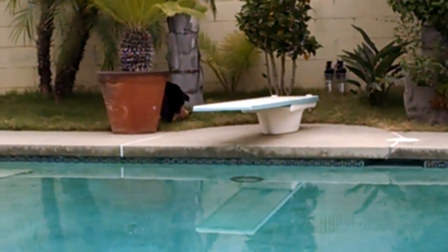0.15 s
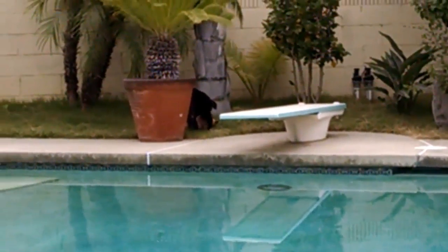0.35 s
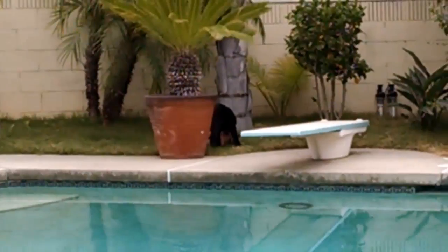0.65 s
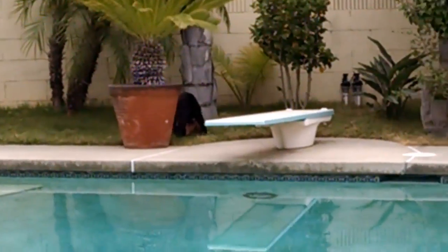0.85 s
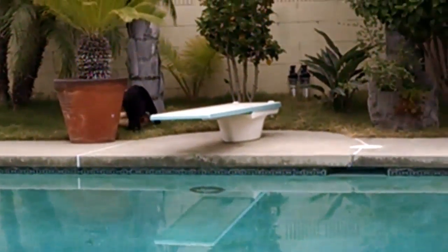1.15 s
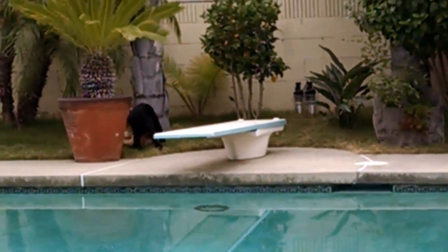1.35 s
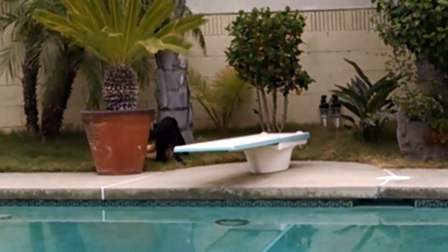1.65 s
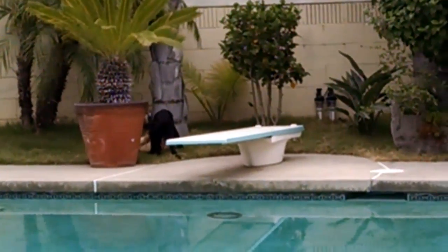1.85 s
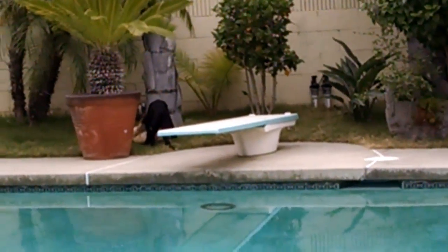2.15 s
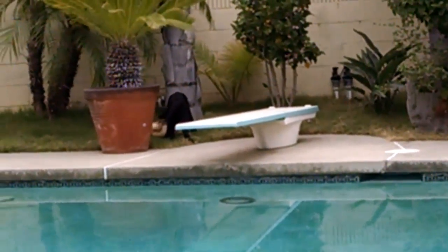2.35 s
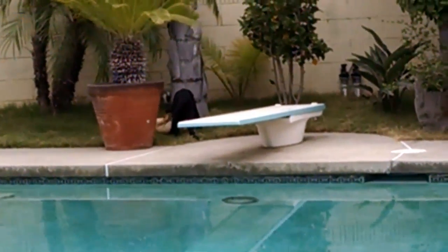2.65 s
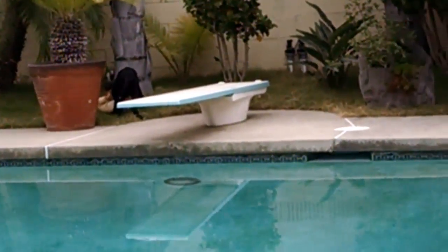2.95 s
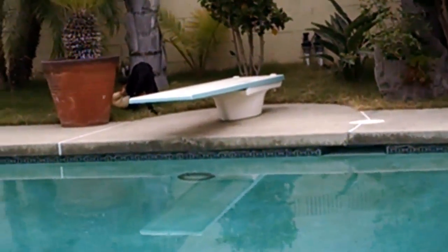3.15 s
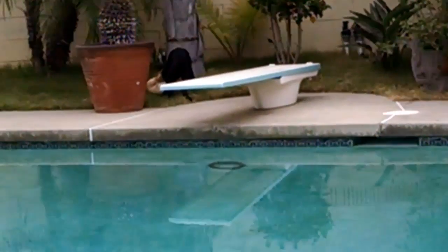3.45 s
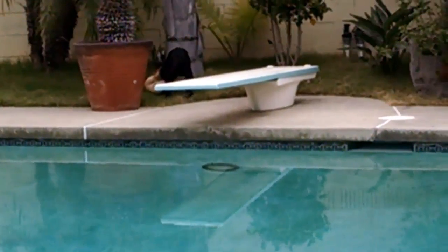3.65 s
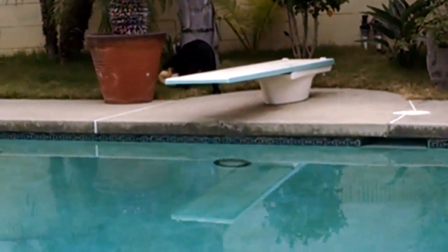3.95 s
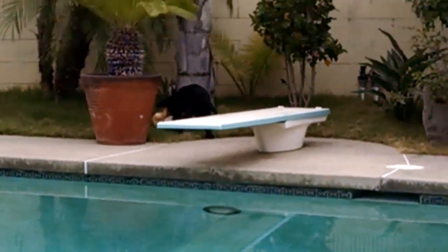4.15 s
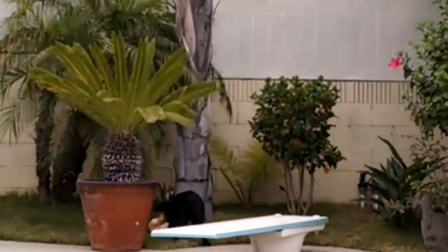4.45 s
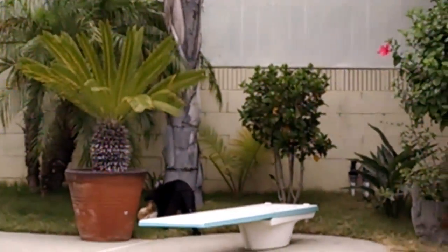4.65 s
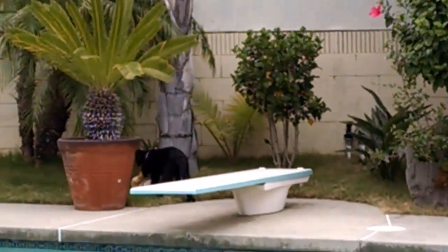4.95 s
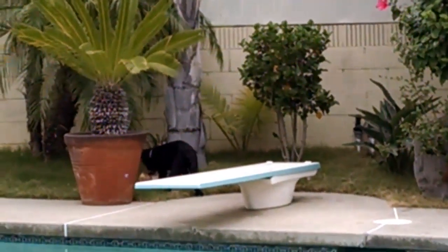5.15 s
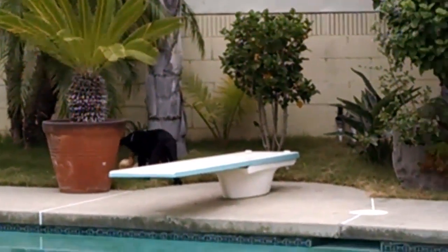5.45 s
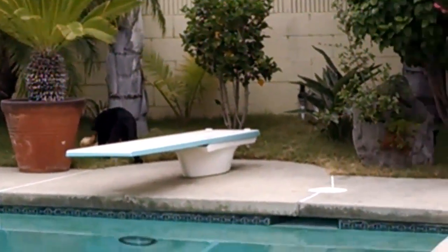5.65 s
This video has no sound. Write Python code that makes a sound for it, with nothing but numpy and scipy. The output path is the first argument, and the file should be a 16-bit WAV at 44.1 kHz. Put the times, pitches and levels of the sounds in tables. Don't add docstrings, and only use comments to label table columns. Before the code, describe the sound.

A pool pump hums steadily while water trickles, gurgles and drips, and a distant engine drone slowly swells over a soft low rumble.

```python
import sys
import numpy as np
from scipy import signal
from scipy.fft import rfft, irfft, next_fast_len
from scipy.io import wavfile
from scipy.ndimage import uniform_filter1d

SR = 44100
rng = np.random.default_rng(int(sys.argv[2]) if len(sys.argv) > 2 else 0)


def makeup_ratio(level_db):
    decades = np.asarray(level_db, float) / 20
    return 10 ** decades


def inscribe(sig):
    pcm = np.round(np.clip(np.atleast_2d(sig).T, -1, 1) * 32767)
    wavfile.write(sys.argv[1], SR, pcm.astype(np.int16))


N = 255339
STEP = 16


def evened(x):
    return x / np.sqrt(np.mean(abs(x) ** 2) + 1e-20)


def read(points, hz):
    f, *columns = np.transpose(points)
    return np.array([np.interp(np.log(hz + 1), np.log(f + 1), c) for c in columns])


def curves(rows, t):
    s, *columns = np.transpose(rows)
    return [np.interp(t, s, c) for c in columns]


def drift(t, top_hz):
    rates_hz = np.geomspace(top_hz / 20, top_hz, num=12)
    return evened(sum(np.sin(2 * np.pi * (f * t + rng.random())) / np.sqrt(f) for f in rates_hz))


def tone(turns, db, pan_db, lead_rad):
    side = np.array([[.5], [-.5]])
    return np.sqrt(2) * makeup_ratio(db + side * pan_db) * np.sin(2 * np.pi * turns + side * lead_rad)


def fading(t, depth_db, top_hz):
    slow = t[::16]
    return [np.interp(t, slow, k * depth_db * drift(slow, top_hz)) for k in (1, 1.3, .25)]


def noise(size, count):
    hop = size // 4
    frames = N // hop + 5
    a, b = rng.standard_normal((frames, size // 2 + 1, count, 2)).T
    return np.fft.rfftfreq(size, 1 / SR), np.arange(frames) * hop / SR, a + 1j * b


def sounded(z, size):
    return signal.istft(z, nperseg=size, noverlap=size * 3 // 4)[1][:, :N]


def add(mix, s, sound):
    part = mix[:, round(s * SR):][:, :sound.shape[1]]
    part += sound[:, :part.shape[1]]


# time in seconds, casing tone in dB, hum L-R in dB, hum in dB,
# hum left lead in rad.
PUMP = [(0.0, -42, 4.5, -54.5, 0.5), (1.3, -48, 10, -54.5, 1.2), (2.4, -46, 1, -50, 2),
        (3.2, -43.5, -1, -53, 1), (4.2, -41.5, 11, -51.5, 1), (4.8, -41, 0, -51, 2),
        (5.3, -43.5, 1, -56, -.6), (5.79, -45.5, 3, -66, 3)]
# Hz, level at the end in dB, gain in dB per second, L-R in dB, left lead in rad.
PUMP_TONES = [(240.0, -62, 1.5, -3, -.6), (346.3, -67, -1, .6, -.6), (349.0, -62, .8, -3, .3),
              (360.0, -62, .3, .6, -.6), (599.8, -61, 3, -3, -.2), (693.0, -67, 1.2, .6, -.3),
              (1038.0, -71, 1.2, -1, 0)]
HUM_HZ, CASING_HZ = 120.0, 174.45


def pump(t):
    casing_db, pan_db, hum_db, lead_rad = curves(PUMP, t)
    swell_db = fading(t, depth_db=2.5, top_hz=2.63)[0]
    out = tone(HUM_HZ * t, hum_db + swell_db, pan_db, lead_rad)
    out += tone(CASING_HZ * t, casing_db, -0.69, -0.85)
    for hz, end_db, gain_db, side_db, ahead_rad in PUMP_TONES:
        swell_db, sway_db, shift_rad = fading(t, depth_db=2.5, top_hz=2.63)
        level_db = end_db + gain_db * (t - t[-1]) + swell_db
        out += tone(hz * t + rng.random(), level_db, side_db + sway_db, ahead_rad + shift_rad)
    return out


# time in seconds, shaft in Hz, nearness in dB, clear path past the walls in dB.
ENGINE = [(0.0, 23.34, -49.5, -53), (0.8, 23.1, -54, -52), (1.2, 23.11, -56, -55), (1.6, 23.16, -50, -52.5),
          (2.0, 23.07, -49, -51), (2.3, 22.85, -50, -50), (2.6, 22.89, -53.5, -53),
          (2.9, 23.03, -47.5, -47.5), (3.2, 22.86, -46.5, -54), (3.6, 22.78, -42.5, -56),
          (4.0, 22.81, -44, -53.5), (4.4, 22.85, -36.5, -52), (4.6, 22.72, -34, -49.5),
          (4.8, 22.77, -34.5, -45.5), (5.1, 22.69, -34, -45), (5.37, 22.8, -34.5, -51),
          (5.56, 22.77, -36.5, -46.5), (5.79, 22.76, -38, -47.5)]
# shaft order, level at the loudest in dB, share of nearness followed,
# share of clear path followed, L-R in dB, left lead in rad.
ORDERS_HEARD = [(4, -46.5, 0.86, 0.0081, 0, 0.6), (15, -51, 0.11, 0.96, -8, -2.05),
                (24, -58.5, 0.5, 1.5, -2, -0.61), (28, -56.5, 0.14, 1.64, -7, 1.1)]
ECHOED_ORDERS = [8, 9, 12, 16, 20, 23, 18]
# middle in seconds, half length in seconds, level in dB,
# L-R in dB, left lead in rad.
ECHO_PATHS = [
    [(.3, 0.4, -80, 0, 1.4), (1.2, 1, -57, -11, -0.5), (2.2, 1, -56.5, -3, 0.82), (3.0, 0.78, -49, 1, -1.3),
     (4.0, 0.28, -50, -13, .5), (4.85, 0.45, -41.5, -2, -0.28), (5.55, 0.48, -47, 11, -1.6)],
    [(.2, 0.22, -61, 16, 6.7), (1.75, 0.48, -46, -3, 0.32), (2.4, 0.28, -52.5, 5, 1.1),
     (3.1, 0.32, -55.5, 14, 1.52), (3.8, 0.39, -57, -5, 1.5), (4.6, 0.23, -52, -7, 1.3),
     (5.5, 0.71, -43, 2.5, 0.59)],
    [(.1, 0.27, -57, 2, 1), (.9, 0.49, -54, 9, 1.4), (1.7, 0.25, -53.5, 9, 0.8),
     (2.25, 0.23, -56.5, 3, 0.5), (4.2, 0.26, -60, 7, -2.5), (4.95, 0.27, -55.5, 12, 0.5),
     (5.4, 0.26, -56, -4, -4.5)],
    [(.4, 0.67, -66, -10, 2.5), (1.55, 0.21, -51, -2, 1), (2.4, 0.45, -48.5, -6, 1.26),
     (3.2, 0.21, -60, -6, -4.5), (3.8, 0.27, -54, 0, 1.5), (4.3, 0.39, -59, 6, -3.5),
     (4.8, 0.32, -45, 4, -1.7), (5.3, 0.28, -51, -5, -3.5), (5.7, 0.49, -48.5, -7, -0.8)],
    [(4.1, .4, -67, -1, 1), (4.95, 0.27, -45, 10, 3.5), (5.65, 0.36, -50.5, 2, 0.45)],
    [(.3, 0.44, -61.5, -5, .5), (1.1, .4, -64.5, -4, .5), (2.3, 0.29, -64.5, 0, .5),
     (4.95, 0.28, -53, 0, 0.67), (5.6, .25, -62, 2, .5)],
    [(.3, 0.26, -63, 2, 0.57), (1.5, 0.11, -58, -2, 0.46), (2.3, 0.55, -60, 0, .5)],
]
SWEEP_RAD = 0.17
FARTHEST_RIGHT_S, RIGHT_DB, SWING_DB_PER_S2 = 2, -7.5, 1.0
MOST_AHEAD_S, AHEAD_RAD, BEND_RAD_PER_S2 = 3.78, 6.43, 0.37


def engine_follow_db(t, by_near, by_clear):
    _, near_db, clear_db = curves(ENGINE, t)
    return by_near * (near_db - near_db.max()) + by_clear * (clear_db - clear_db.max())


def engine(t):
    shaft_hz, near_db, _ = curves(ENGINE, t)
    turns = np.cumsum(shaft_hz) * STEP / SR
    pan_db = RIGHT_DB + SWING_DB_PER_S2 * (t - FARTHEST_RIGHT_S) ** 2
    lead_rad = AHEAD_RAD - BEND_RAD_PER_S2 * (t - MOST_AHEAD_S) ** 2
    out = tone(6 * turns, near_db, pan_db, lead_rad)
    for order, db, by_near, by_clear, side_db, ahead_rad in ORDERS_HEARD:
        swell_db, sway_db, shift_rad = fading(t, 0.048 * order, top_hz=1.54)
        level_db = db + engine_follow_db(t, by_near, by_clear) + swell_db
        out += tone(round(order) * turns + rng.random(), level_db, side_db + sway_db, ahead_rad + shift_rad)
    for order, paths in zip(ECHOED_ORDERS, ECHO_PATHS):
        start = rng.random()
        flutter_db = fading(t, 0.071 * order, top_hz=6.0)[0]
        for middle, half, db, side_db, ahead_rad in paths:
            opening = np.exp(-((t - middle) / half) ** 2)
            lead_rad = ahead_rad - SWEEP_RAD * order * (t - middle)
            out += opening * tone(order * turns + start, db + flutter_db, side_db, lead_rad)
    return out


# Hz, level in dB per Hz.
RUMBLE = [(25, 3.5), (50, 1.5), (80, 4.5), (150, 3.5), (300, 1.3), (450, 0), (650, -3.5), (900, -14),
          (1400, -24), (2500, -54)]
# Hz, left-right likeness from -1 to 1.
RUMBLE_SAME = [(25, -0.8), (45, -0.12), (70, 0.52), (150, 0.96), (350, 0.76), (500, 0.4), (900, 0.94)]
RUMBLE_DB = -49.5


def rumble(t):
    hz, _, (left, other) = noise(size=2048, count=2)
    same = np.clip(read(RUMBLE_SAME, hz).T, -1, 1)
    right = same * left + np.sqrt(1 - same ** 2) * other
    z = np.array([left, right]) * makeup_ratio(read(RUMBLE, hz).T)
    level_db = RUMBLE_DB + engine_follow_db(t, by_near=0.15, by_clear=0.19)
    return makeup_ratio(level_db + 5.0) * evened(sounded(z, 2048))


# start in seconds, rise in dB, dying time in seconds.
SURGES = [(0.0, 12, 0.02), (0.3, 1.5, 0.056), (0.64, 1.5, 0.039), (0.72, 4, 0.13), (0.95, 3, 0.041),
          (1.25, 1.5, 0.29), (1.62, 25, 0.013), (1.75, 5, 0.043), (1.85, 2, 1), (2.12, 11, 0.019),
          (2.3, 3.5, 0.14), (2.47, 7.5, 0.042), (2.75, 1.5, 0.73), (3.2, 3, 0.037), (3.45, 2.5, 0.95),
          (3.8, 1.5, 0.42), (4.19, 4.5, 0.14), (4.51, 4, 0.23), (4.76, 6, 0.15), (5.15, 1.5, 0.63),
          (5.38, 9, 0.032), (5.53, 13, 0.031), (5.65, 4.5, 0.22)]
HISS_DB, SURGE_RISE_S = -58.5, 0.015


def surging(s):
    start, db, dying = np.transpose(SURGES)[:, :, None]
    age = np.maximum(s - start, 0)
    return HISS_DB + np.sum(db * (1 - np.exp(-age / SURGE_RISE_S)) * np.exp(-age / dying), 0)


# Hz, level in dB per Hz.
HISS = [(300, -4), (700, 12), (1300, 8.5), (2100, 6.5), (3000, 7), (4000, 3.5), (6000, 1.9), (9000, 0.35),
        (12000, 0.5), (14500, 1), (15500, 1.5)]
# time in seconds, dip in Hz,
# dip depth in dB, one-sided hiss in dB.
SWAY = [(0.0, 2700, 4, -6), (0.15, 2640, 3, 1), (0.7, 2610, 0, -2), (0.95, 2360, 4, -2),
        (1.25, 2500, 3, -1), (1.6, 2380, -3.5, 1), (1.9, 2450, 1, -1.5), (2.3, 2800, 4, 1.5),
        (2.6, 2680, -3, -1.5), (2.9, 2610, -2.5, -1.5), (3.3, 2550, 2, 2), (3.7, 2520, 2.5, -1.5),
        (4.1, 2300, 2.5, 1), (4.35, 2730, 0.5, -1), (4.9, 2360, 1.5, -1.5), (5.2, 2700, 1.5, 3),
        (5.5, 2800, 1, 0), (5.79, 2840, 4, -0.5)]
DIP_WIDTH_HZ = 450
PORT_DELAY_S = 17.2 / SR


def trickle():
    hz, s, z = noise(size=256, count=4)
    grain = uniform_filter1d(rng.standard_normal(z[0].shape), 5, 0)
    patches = evened(uniform_filter1d(grain, 30, 1))
    flicker = evened(uniform_filter1d(rng.standard_normal(len(s)), 12))
    direction = np.tanh(0.79 * drift(s, top_hz=6.5))
    arrival = np.exp(2j * np.pi * hz[:, None] * PORT_DELAY_S * direction)
    z[1] = 0.59 * z[0] * arrival + np.sqrt(1 - 0.47 ** 2) * z[1]
    dip_hz, dip_db, own_db = curves(SWAY, s)
    z[2:] *= makeup_ratio(own_db - 3.2 * patches[::-1])
    dip = np.exp(-((hz[:, None] - dip_hz) / DIP_WIDTH_HZ) ** 2)
    cancelled = 1 - makeup_ratio(-1.4 * dip_db * dip)
    z[:2] -= cancelled * z[:2].mean(0)
    z[2:] -= cancelled * z[2:].mean(0)
    field_db = surging(s) + 1.19 * patches + 0.78 * flicker
    colour = makeup_ratio(read(HISS, hz).T)
    colour /= np.sqrt(np.sum(colour[hz > 3000] ** 2))
    return makeup_ratio(6.5) * sounded(z * colour * makeup_ratio(field_db), 256)


# start in seconds, length in seconds, level in dB, Hz.
WHISTLES = [
    (0.0, 0.065, -49.5, 3195),
    (0.0, 0.039, -54, 2540),
]


def whistles():
    out = np.zeros((4, N))
    ports = np.array([[1], [0], [1], [1]])
    for s, length, db, hz in WHISTLES:
        t = np.arange(0, length, 1 / SR)
        swell = np.sin(np.pi * (0.13 + 0.76 * t / length))
        add(out, max(s, 0), makeup_ratio(db) * swell * np.sin(2 * np.pi * hz * t) * ports)
    return out


# middle in seconds, half length in seconds, level in dB.
GURGLE = [
    [(1.0, 0.25, -53), (1.7, 0.2, -76), (2.3, 0.43, -47), (2.7, 0.11, -54), (3.2, 0.11, -59),
     (4.35, 0.057, -61), (4.7, 0.12, -52.5), (5.2, 0.24, -55), (5.6, 0.27, -43)],
    [(0.03, 0.1, -56), (0.17, 0.039, -69), (0.55, 0.34, -54.5), (1.0, 0.08, -58), (1.5, 0.31, -54.5),
     (1.8, 0.031, -51), (2.2, 0.18, -59.5), (2.7, 0.1, -57), (3.45, 0.051, -55), (4.75, 0.097, -58)],
]
# centre in Hz, half width in Hz, level in dB.
HOLLOWS = [
    [(2070, 100, -7), (2390, 240, -6.5)],
    [(3150, 310, -2), (3640, 200, -5.5)],
]
CALM_DB = -85


def spells(rows, s):
    middle, half, db = np.transpose(rows)[:, :, None]
    return makeup_ratio(CALM_DB) + np.sum(makeup_ratio(db) * np.exp(-((s - middle) / half) ** 2), 0)


def gurgle():
    hz, s, z = noise(size=512, count=4)
    gain = 0
    for hollows, rows in zip(HOLLOWS, GURGLE):
        for centre_hz, half_hz, db in hollows:
            gulps = evened(uniform_filter1d(rng.standard_normal(len(s)), 8))
            peak = 1 / (1 + ((hz - centre_hz) / half_hz) ** 2)
            peak = (peak / np.linalg.norm(peak))[:, None]
            gain = gain + peak * spells(rows, s) * makeup_ratio(db + 3.8 * gulps)
    return makeup_ratio(-5.0) * sounded(z * gain, 512)


RIM_ECHO_S = .0045


def splashes(rows, spread, widest_hz, rise, tail_db, crack_db, echo_db, impact, size):
    out, t = np.zeros((4, N)), np.arange(size) / SR
    bursts = rng.standard_normal((len(rows), 2, 4, size))
    for (s, db, hz, ms), (real, imag) in zip(rows, bursts):
        low = signal.butter(2, min(spread * hz, widest_hz) / 2, fs=SR, output="sos")
        knock = impact * np.sign(real[:, :1]) * (t < .0003)
        slow = signal.sosfilt(low, real + 1j * imag + knock)
        ring = (evened(slow) * np.exp(2j * np.pi * hz * t)).real
        u = t / (ms / 1000)
        shape = (1 - np.exp(-u / rise)) * (np.exp(-1.3 * u) + makeup_ratio(tail_db) * np.exp(-t / 0.1))
        crack_low = signal.butter(2, min(3.1 * hz, 15000), fs=SR, output="sos")
        crack = np.exp(-t / 0.003) * signal.sosfilt(crack_low, imag)
        drop = shape * ring + makeup_ratio(crack_db) * crack
        add(out, s, makeup_ratio(db - 2.2) * drop)
        add(out, s + RIM_ECHO_S, makeup_ratio(db + echo_db) * drop[::-1])
    return out


# start in seconds, peak in dB, Hz.
DRIPS = [(0.062, -51, 3600), (0.095, -49, 3370), (0.13, -56, 3240), (0.005, -49, 960), (0.045, -46, 655),
         (0.299, -44, 515), (0.35, -39.5, 669), (0.774, -41, 925), (0.83, -48, 1834), (0.939, -43.5, 1008),
         (0.945, -39.5, 3100), (1.06, -46, 1650), (1.3, -42, 315), (1.552, -57, 340), (1.995, -43, 1800),
         (2.245, -52, 2130), (2.468, -50, 2030), (2.517, -41, 1974), (2.548, -43, 1572), (2.677, -43, 1401),
         (3.12, -42.5, 1604), (3.13, -44, 1300), (5.13, -45, 1294), (4.26, -39.5, 987), (4.5, -60, 990),
         (3.169, -44, 1140), (3.299, -42, 1993), (3.433, -43, 630), (3.415, -42, 739), (3.475, -46, 645),
         (3.485, -43, 722), (3.262, -41.5, 602), (3.3, -58, 620), (3.352, -44, 965), (3.752, -44, 1323),
         (4.264, -52, 1110), (4.32, -43.5, 2080), (4.583, -52, 1920), (4.681, -44, 1750),
         (4.769, -38.5, 998), (4.803, -45, 2070), (4.916, -49, 637), (5.378, -44.5, 1207),
         (5.51, -42.5, 1025), (5.63, -43, 970)]
DRIP_CYCLES = 21.2


def drips():
    rows = [(s, db, hz, 1000 * DRIP_CYCLES / hz) for s, db, hz in DRIPS]
    return splashes(rows, spread=0.076, widest_hz=150, rise=0.047, tail_db=-12, crack_db=-33,
                    echo_db=-17.5, impact=0.51, size=5120)


STRAY_COUNT, STRAY_DB = 18, -65


def strays():
    when, size, pitch = rng.random((STRAY_COUNT, 3)).T
    return list(zip(when * N / SR * .99, STRAY_DB - 4.0 * size, 2000 * 7.0 ** pitch))


# start in seconds, peak in dB, Hz.
TICKS = [(1.006, -48, 3260), (1.844, -41.5, 3380), (2.237, -49, 3760), (2.26, -41.5, 3540),
         (2.822, -47, 3800), (3.171, -47, 3824), (4.25, -43, 3800), (4.578, -54, 3970),
         (4.758, -44.5, 3880), (4.779, -43, 3800), (4.829, -44, 3950), (4.842, -40, 3820),
         (4.871, -48, 4000), (5.27, -54, 3770), (5.382, -45, 3710), (5.561, -46, 3630), (3.662, -47, 3720),
         (3.7135, -44.5, 3910), (3.766, -47, 3865), (3.824, -53, 3450), (3.871, -53, 3650),
         (3.94, -48, 3750), (4.023, -56, 3940), (1.429, -54, 3500), (1.51, -49, 3570), (1.564, -46, 3110),
         (1.589, -40, 2980), (0.733, -44, 4000), (3.47, -42.5, 3050), (0.35, -38.5, 3090),
         (0.645, -39, 3120), (0.725, -39, 4130), (0.727, -38, 5350), (0.737, -46, 4000), (1.247, -43, 4550),
         (1.39, -40.5, 4010), (1.756, -50, 3600), (1.77, -59, 3530), (2.128, -35, 3810), (2.3, -44, 3900),
         (2.475, -40, 2380), (2.668, -46, 2610), (2.719, -39, 3130), (3.35, -40, 3780),
         (3.465, -38.5, 3052), (4.16, -42, 4400), (4.197, -39, 4041), (4.805, -56, 2310),
         (4.854, -35.5, 4090), (5.091, -40.5, 2900), (5.116, -44, 3850), (5.149, -40, 4755),
         (5.417, -47, 2503), (5.449, -52, 2555), (5.728, -38, 2360)]
TICK_MS = 2.7


def ticks():
    rows = [(*r, TICK_MS) for r in list(TICKS) + strays()]
    return splashes(rows, spread=0.2, widest_hz=1600.2, rise=.04, tail_db=-13.5, crack_db=-6.0,
                    echo_db=-10.5, impact=0.67, size=2048)


# start in seconds, peak in dB, Hz.
SPRAY = [(1.263, -43, 11600), (1.473, -45, 14000), (1.626, -43, 13460), (1.7503, -31, 9000),
         (1.753, -49, 8500), (2.217, -59, 6450), (2.127, -39, 14810), (2.183, -44.5, 9700),
         (2.216, -33.5, 14300), (2.267, -42.5, 14300), (2.261, -47, 14840), (2.335, -38, 13300),
         (2.539, -49, 8252), (2.824, -60, 7910), (2.865, -39, 9600), (3.223, -38, 13780),
         (3.293, -43.5, 9400), (3.316, -44, 13610), (3.467, -40, 9900), (3.814, -45, 14310),
         (3.895, -47, 11300), (4.312, -41, 9260), (4.313, -44, 14130), (4.767, -45, 14650),
         (4.768, -40, 8500), (5.121, -45, 7200), (5.149, -40, 10760), (5.156, -45.5, 14640),
         (5.181, -37, 14000), (5.187, -39, 6000), (5.186, -41, 9000), (5.383, -38, 9700),
         (5.678, -50, 9100)]
SPRAY_MS = 1.85


def spray():
    return splashes([(*r, SPRAY_MS) for r in SPRAY], spread=0.14, widest_hz=1300.0, rise=0.21,
                    tail_db=-23.5, crack_db=-10, echo_db=-14, impact=1.8, size=2048)


# Hz, power share common to both sides, share of that from the right port.
PORTS = [(1290, 0.91, 0.34), (2220, 1, 0.45), (2630, 0.88, 0.17), (3820, 0.91, 0.48), (5330, 0.61, 0.44),
         (6400, 0.45, 0.12), (7900, 0.61, 0.67), (9000, 0.37, 1), (10300, 0.59, 0.88), (11700, 0.51, 0.88),
         (12900, 0.73, 1), (14000, 0.72, 0.64), (14900, 0.8, 0.55), (15400, 0.96, 0.55)]


def port_pair(x):
    size = next_fast_len(N, real=True)
    hz = np.fft.rfftfreq(size, 1 / SR)
    common, right = np.clip(read(PORTS, hz), 0, 1)
    a, b, own_left, own_right = rfft(x, size)
    a = a * np.sqrt(common * (1 - right))
    b = b * np.sqrt(common * right)
    late = np.exp(-2j * np.pi * hz * PORT_DELAY_S)
    shared = np.array([a - b * late, b - a * late])
    own = np.sqrt(1 - common) * np.array([own_left, own_right])
    return irfft(shared + own, size)[:, :N]


def scene():
    t = np.arange(N) / SR
    coarse = np.arange(N // STEP + 1) * STEP / SR
    machines = signal.resample_poly(pump(coarse) + engine(coarse), STEP, 1, axis=1)[:, :N]
    water = trickle() + whistles() + gurgle() + drips() + ticks() + spray()
    return machines + rumble(t) + port_pair(water)


def low_pass(x):
    return signal.sosfilt(signal.butter(12, 15660, fs=SR, output="sos"), x)


def record(dry):
    edge = signal.firwin(1023, 15620, fs=SR)
    mix = signal.oaconvolve(dry, edge[None], "same")
    return low_pass(mix)


dry = scene()
out = record(dry)
inscribe(out)
```